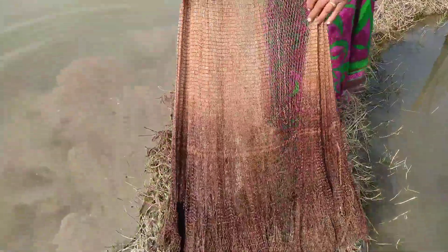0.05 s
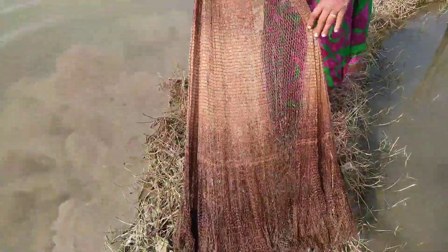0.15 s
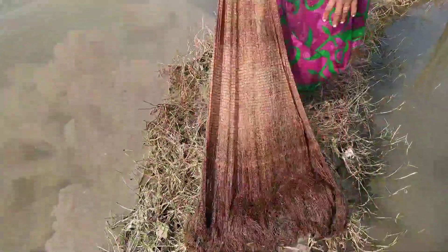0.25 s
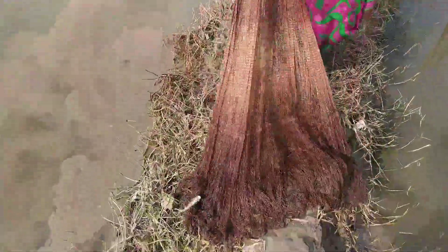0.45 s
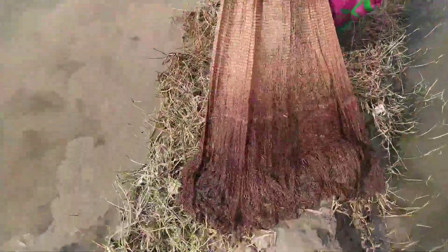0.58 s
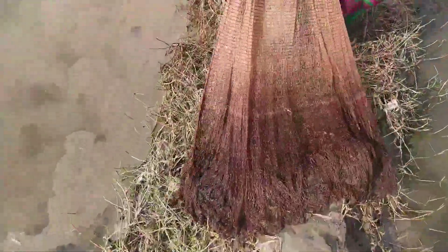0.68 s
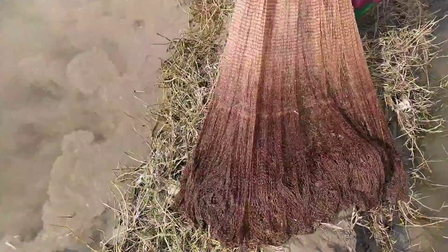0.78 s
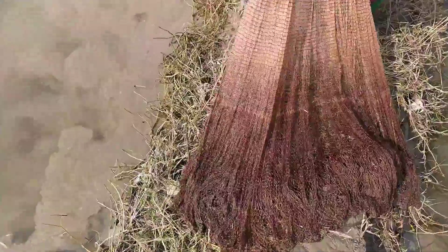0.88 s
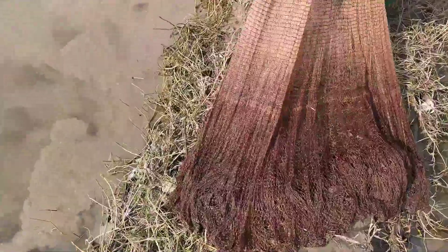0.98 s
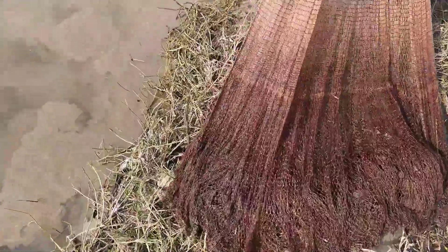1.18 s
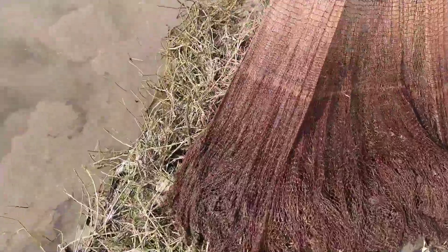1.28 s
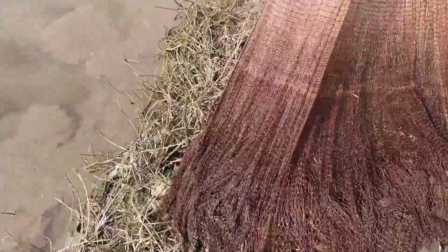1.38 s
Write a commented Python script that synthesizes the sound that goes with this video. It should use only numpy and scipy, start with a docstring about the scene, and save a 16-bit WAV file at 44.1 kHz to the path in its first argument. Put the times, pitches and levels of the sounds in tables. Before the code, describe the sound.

Close wet net lands on a grassy bank, spattering drops and settling with faint ticks.

```python
"""A wet fishing net dropped on a grassy bank, close to a stereo microphone.
The hem slaps down and the net's weight thuds on the soil; the mesh follows in a short, bright
spatter of wet strands and drops, a little to the left. As it settles, stalks tick, grass crinkles,
twine squeaks and water shifts in the mesh. Behind it: low outdoor air and one faint, far bird."""
import sys
import numpy as np
from scipy import signal
from scipy.fft import rfft, irfft
from scipy.io import wavfile
from scipy.ndimage import uniform_filter1d

SR = 44100
rng = np.random.default_rng(int(sys.argv[2]) if len(sys.argv) > 2 else 0)


def to_wav(sig):
    """Store sig (one row per channel, or 1-D mono) as 16-bit WAV at the path in sys.argv[1].

    Samples outside -1..1 are clipped; the rate is SR.
    """
    pcm = np.clip(np.atleast_2d(sig), -1, 1) * 32767
    pcm = np.round(pcm).astype(np.int16)
    wavfile.write(sys.argv[1], SR, pcm.T)  # frames by channels


N = 63945
T = np.arange(N) / SR


def amp(db):
    """Decibels to gain."""
    return 10 ** (np.asarray(db) / 20)


def unit(x):
    """Scales to an rms of one."""
    return x / np.sqrt(np.mean(x ** 2) + 1e-20)


def curve(points):
    """A control curve at every sample."""
    return np.interp(T, *np.transpose(points))


def read(points, hz, column=1):
    """One column of a spectrum table on a log-frequency axis."""
    table = np.array(points, float)
    return np.interp(np.log(hz + 1), np.log(table[:, 0] + 1), table[:, column])


def pan(db):
    """Left and right gains for a level difference; positive is left."""
    return amp(np.array([[.5], [-.5]]) * db)


def add(mix, start_s, sound):
    """Mixes a stereo sound in at a time."""
    part = mix[:, max(round(start_s * SR), 0):][:, :sound.shape[1]]
    part += sound[:, :part.shape[1]]


def coloured(x, points):
    """Gives noise a spectrum, at an rms of one."""
    gain = amp(read(points, np.fft.rfftfreq(N, 1 / SR)))
    return unit(irfft(rfft(x) * gain, N))


def highpass(x, hz):
    """Takes away the body below a frequency."""
    return signal.sosfilt(signal.butter(3, hz, "high", fs=SR, output="sos"), x)


def wide_noise():
    """Noise that is alike on both sides in the low middle and much less so elsewhere."""
    # likeness of the two channels: (frequency [Hz], correlation [-1..1])
    likeness = [(25, -0.075), (70, 0.31), (160, 0.86), (500, 0.46), (1200, 0.47), (3000, -0.11),
                (8000, -0.49)]
    same = read(likeness, np.fft.rfftfreq(N, 1 / SR))
    left, other = rfft(rng.standard_normal((2, N)))
    right = same * left + np.sqrt(1 - same ** 2) * other
    return irfft(np.array([left, right]), N)


def blurred_tone(phase, width_hz):
    """A tone widened into a narrow band by a random wobble, different on each side."""
    band = np.exp(-(np.fft.fftfreq(N, 1 / SR) / width_hz) ** 2)
    wobble = np.fft.ifft(np.fft.fft(rng.standard_normal((2, N))) * band)
    return (wobble / np.std(wobble) * np.exp(1j * phase)).real


def grains(per_s, spread_db, scatter_db=3):
    """Random clicks of uneven size, each reaching the microphone from its own direction."""
    fires = rng.random(N) < per_s / SR
    size = amp(spread_db * np.minimum(rng.exponential(1, N), 3))
    sign = rng.choice([-1, 1], N)
    side, jitter = rng.standard_normal((2, N))
    left, right = fires * sign * size * pan(scatter_db * side)
    left_lag = np.round(.91 + 1.2 * jitter).astype(int)  # samples
    arrival = np.clip(np.arange(N) + left_lag, 0, N - 1)
    return np.array([np.bincount(arrival, left, N), right])


def mic_colour(size=512):
    """The bright colour that the left and right microphones each give a click, peak one."""
    # colour of each microphone: (frequency [Hz], left [dB], right [dB])
    colour = [(302, -49, -62), (1310, -22, -19.5), (2250, -8, -20.5), (3460, -18.5, -19),
              (3940, -17.5, -10.5), (5660, -11, -13), (6380, -4, -10), (7300, -3, -3.5), (9040, -3, 6),
              (10300, -14, 0), (11060, -6, -12), (11450, -18.5, -7), (13900, -19.5, -16.5),
              (15600, -45.5, -16.5)]
    hz = abs(np.fft.fftfreq(size, 1 / SR))
    log_gain = np.log(amp([read(colour, hz, column=1), read(colour, hz, column=2)]))
    minimum_phase = np.exp(np.conj(signal.hilbert(log_gain)))
    response = np.fft.ifft(minimum_phase).real[:, :size // 2]
    return response / abs(response).max()


def through_mics(clicks):
    """Gives each side of a train of clicks its microphone's colour."""
    return signal.oaconvolve(clicks, mic_colour(), axes=1)[:, :N]


def cycles(hz, length_s, snap, size=256):
    """A few cycles of ring that swell and die around a snap in the microphones' colour, peak one."""
    t = np.arange(size) / SR - length_s / 2
    swell = np.cos(np.pi * np.clip(t / length_s, -.5, .5)) ** 2
    ring = swell * np.cos(2 * np.pi * hz * t) * np.ones((2, 1))
    add(ring, length_s / 2, snap * mic_colour())
    return ring / abs(ring).max()


def impact(tail_gain, decay_s, size):
    """An impulse with a dying tail of noise; the left side hears it one sample late."""
    t = np.arange(size) / SR
    push = tail_gain * rng.standard_normal((2, size)) * np.exp(-t / decay_s)
    push[0, 1] = push[1, 0] = 1
    return push


def outdoor_air(level_db=-53, gust_db=1.5, gust_s=.04, rumble_hz=120):
    """Low open air all around the bank; light gusts move its rumble."""
    # spectrum of the air: (frequency [Hz], level [dB])
    colour = [(25, 2.5), (90, -2.5), (120, -9.5), (165, -6), (300, -20.5), (600, -23.5), (1200, -30.5),
              (2200, -53), (3500, -41), (9000, -30), (15500, -60)]
    air = amp(level_db) * coloured(wide_noise(), colour)
    rumble = signal.sosfiltfilt(signal.butter(2, rumble_hz, fs=SR, output="sos"), air)
    gust = unit(uniform_filter1d(rng.standard_normal(N), round(gust_s * SR)))
    return air + rumble * (unit(amp(gust_db * gust)) - 1)


def far_bird():
    """Two faint falling calls, blurred by distance."""
    # bird calls: (middle [s], length [s], pitch [Hz], glide [Hz/s], width [Hz], level [dB])
    calls = [(.015, .19, 1040, -1000, 130, -64), (.772, .072, 2700, -300, 70, -66)]
    out = np.zeros((2, N))
    for s, length, hz, glide, width, db in calls:
        phase = 2 * np.pi * np.cumsum(hz + glide * (T - s)) / SR
        swell = np.cos(np.pi * np.clip((T - s) / length, -.5, .5)) ** 2
        out += amp(db) * swell * (blurred_tone(phase, width) + .6 * np.cos(phase))
    return out


def settling_mesh(crinkle_db=-15):
    """The mesh fizzes finely, crinkles dry grass and drags softly over it."""
    # rustle of the mesh: (time [s], level [dB])
    rustle_level = [(0, -89.5), (.1, -96), (.19, -82), (.45, -57.5), (.53, -51), (.62, -59), (.67, -56.5),
                    (.8, -61.5), (.95, -60.5), (1.02, -56), (1.05, -48), (1.08, -61), (1.115, -49.5),
                    (1.17, -59.5), (1.33, -54.5), (1.45, -60.5)]
    # where the rustle sits: (time [s], left minus right [dB])
    rustle_side = [(0, -6), (.55, 6.5), (.95, 1), (1.45, 2)]
    # net dragging over grass: (time [s], level [dB])
    drag_level = [(0, -63.5), (.5, -62), (.75, -67), (.92, -63), (1.1, -61.5), (1.19, -59.5), (1.36, -59),
                  (1.45, -63.5)]
    # spectrum of the drag: (frequency [Hz], level [dB])
    drag_colour = [(100, 3), (420, -5.5), (1000, -9.5), (2100, -4), (3500, -9.5), (8000, -18.5)]
    fizz = unit(highpass(through_mics(grains(per_s=7000, spread_db=5.5)), hz=3540))
    crinkle = amp(crinkle_db) * unit(highpass(grains(per_s=500, spread_db=3), hz=9000))
    rustle = (fizz + crinkle) * amp(curve(rustle_level)) * pan(curve(rustle_side))
    drag = coloured(wide_noise(), drag_colour) * amp(curve(drag_level))
    return rustle + drag


def stalk_ticks():
    """Close by, a stalk snaps free or a drop lands: a few cycles of ring and a tiny crackle."""
    # single ticks: (time [s], level [dB], left minus right [dB], pitch [Hz], crackle decay [s])
    ticks = [(0.11, -28.5, 13, 8550, 0.0026), (0.1762, -34.5, 13, 8500, .001),
             (0.4656, -29.5, 12.5, 7370, 0.009), (0.5511, -16.5, 7, 8060, 0.0049),
             (0.6463, -39.5, 7, 6800, .002), (.671, -35.5, 7, 7200, 0.0044), (0.913, -32, 6, 9050, 0.0085),
             (.982, -39.5, -2, 6240, .003), (1.32, -24.5, 7, 6700, 0.004),
             (1.3486, -25.5, -1, 9100, 0.0057)]
    out = np.zeros((2, N))
    for s, db, side_db, hz, crackle_s in ticks:
        crackle = impact(tail_gain=.06, decay_s=crackle_s, size=1024)
        tick = signal.fftconvolve(crackle, cycles(hz, length_s=.00054, snap=.25), axes=1)
        add(out, s, amp(db) * pan(side_db) * tick)
    return highpass(out, hz=4000)


def soil_thud(rise_s=.022, fall_db_per_s=210):
    """The mass of the net patters dully on the soil in two surges and comes to rest."""
    # the hem lands, then the bulk: (start [s], time to the fall [s], level [dB], left minus right [dB])
    surges = [(0.216, 0.043, -38.5, -5), (0.291, 0.03, -57, -9)]
    # spectrum of the net's weight on soil: (frequency [Hz], level [dB])
    colour = [(40, 6), (110, -3.5), (250, -6), (400, -13), (700, -4.5), (1100, -7), (1700, -8), (2400, -2),
              (3500, -2), (4700, -2.5), (6000, -18)]
    level = np.zeros((2, N))
    for s, hold, db, side_db in surges:
        rise = np.clip((T - s) / rise_s, 0, 1)
        fall_db = fall_db_per_s * np.maximum(T - s - hold, 0)
        level += rise * amp(db - fall_db) * pan(side_db)
    return coloured(grains(per_s=2500, spread_db=1.5, scatter_db=1), colour) * level


def drop(hz, decay_s=.00016, size=256):
    """One drop: a snap and a few cycles of ring."""
    t = np.arange(size) / SR
    ring = np.exp(-t / decay_s) * np.cos(2 * np.pi * hz * t)
    snap = t == 0
    return (ring + snap)[None]


def spatter(low_hz=5260, high_hz=11050, drop_sizes=10):
    """A shower of drops flies off the mesh and hits the grass, each size at its own pitch."""
    # spatter as the mesh comes down: (time [s], level [dB])
    level = [(.221, -50), (.223, -26.5), (.231, -34), (.237, -18), (.256, -18), (.283, -25), (.31, -22),
             (.344, -28.5), (.354, -29.5), (.373, -46.5), (.385, -35), (.4, -42.5), (.44, -53), (.6, -62)]
    # where the drops land: (time [s], left minus right [dB])
    side = [(.3, 6.9), (.37, 10.2)]
    drops = sum(signal.oaconvolve(grains(per_s=530, spread_db=2), drop(hz))[:, :N]
                for hz in np.linspace(low_hz, high_hz, drop_sizes))
    return unit(through_mics(drops)) * amp(curve(level)) * pan(curve(side))


def fold_splats(span_s=.0007):
    """Each wet fold lands near the microphone with a snap of its own pitch and throws a brief spray."""
    # wet folds striking the grass: (time [s], level [dB], left minus right [dB], pitch [Hz])
    folds = [(.2227, -20, 6, 7700), (.2255, -19, 11, 6600), (.2346, -12, 2, 9000), (.237, -13, 7, 6300),
             (.2385, -11, 4, 8400), (.2399, -14, 1, 9300), (.2416, -10, 2, 8300), (.2524, -17, 6, 7100),
             (.2541, -17, 2, 8100), (.2602, -15, 3, 8000), (.2738, -12, 5, 8100), (.2918, -14, 0, 8900),
             (.298, -16, 4, 7600), (.3045, -18, 6, 7000), (.3101, -15, 0, 8200), (.3123, -10, 3, 8100),
             (.3196, -15, 7, 6700), (.3252, -14, 0, 8900), (.3353, -16, 8, 7600), (.3365, -17, 9, 7000),
             (.3426, -16, 5, 7900), (.3579, -20, 15, 7400), (.3616, -25, 5, 7400), (.3866, -30, 10, 7300)]
    out = np.zeros((2, N))
    for s, db, side_db, hz in folds:
        ring_s = rng.uniform(.0003, .00094)
        spray = impact(tail_gain=.2, decay_s=.0009, size=512)
        hit = signal.fftconvolve(spray, cycles(hz, ring_s, snap=1), axes=1)
        hit = highpass(hit, hz=3800)
        hit *= np.sqrt(span_s * SR / (hit ** 2).sum(1, keepdims=True))  # energy of rms one over span_s
        add(out, s - ring_s / 2, amp(db) * pan(side_db) * hit)
    return out


def hem_knocks():
    """Dull, damped rings where the hem bumps the ground."""
    # bumps of the hem: (time [s], pitch [Hz], level [dB], decay [s], left minus right [dB])
    knocks = [(0.2249, 2448, -25.5, 0.0021, 7.5), (.256, 729, -39.5, 0.011, 2),
              (1.187, 524, -46, 0.0028, -1.5)]
    out, t = np.zeros((2, N)), np.arange(2048) / SR
    for s, hz, db, decay, side_db in knocks:
        ring = np.exp(-t / decay) * np.sin(2 * np.pi * hz * t)
        add(out, s, amp(db) * pan(side_db) * ring)
    return out


def twine_squeaks(decay_s=.01):
    """Wet twine draws tight on the right: thin, fuzzy squeaks that start at once and fade."""
    # squeaks of the twine: (time [s], pitch [Hz], level [dB])
    squeaks = [(.914, 9150, -47), (.9655, 9750, -47)]
    out = np.zeros((2, N))
    for s, hz, db in squeaks:
        fade = (T > s) * np.exp(-abs(T - s) / decay_s)
        out += amp(db) * fade * blurred_tone(2 * np.pi * hz * T, width_hz=600)
    return out * pan(db=-12.5)


def water_sloshes():
    """Water shifts in the soaked mesh: brief, soft swells, dead centre."""
    # swells of water: (middle [s], half length [s], centre frequency [Hz], level [dB])
    sloshes = [(0.947, 0.01, 1000, -63), (1.184, 0.0037, 1800, -58.5)]
    out = np.zeros(N)
    for s, half_length, hz, db in sloshes:
        swell = np.exp(-((T - s) / half_length) ** 2)
        out += amp(db) * swell * unit(blurred_tone(2 * np.pi * hz * T, width_hz=440)[0])
    return out


def scene():
    """The net lands and settles in the foreground, with open air and the bird behind."""
    landing = fold_splats() + spatter() + soil_thud() + hem_knocks()
    settling = stalk_ticks() + twine_squeaks() + water_sloshes() + settling_mesh()
    return landing + settling + outdoor_air() + far_bird()


def record(dry, ceiling=.78, edge_hz=16300):
    """The recorder rounds off the loudest peaks, then cuts the highest treble."""
    soft = dry / (1 + (dry / ceiling) ** 6) ** (1 / 6)
    lowpass = signal.firwin(255, edge_hz, window=("kaiser", 9), fs=SR)
    return signal.oaconvolve(soft, lowpass[None], "same")


dry = scene()
out = record(dry)
to_wav(out)
```